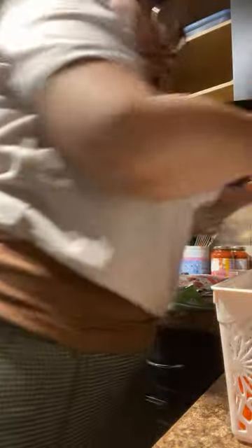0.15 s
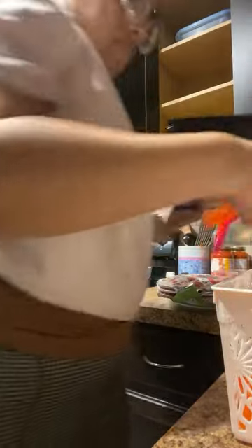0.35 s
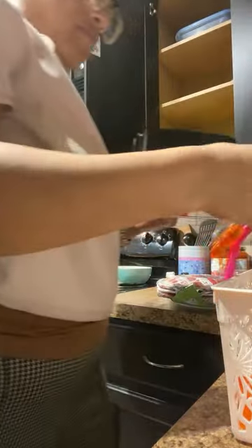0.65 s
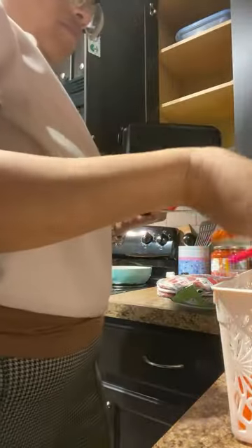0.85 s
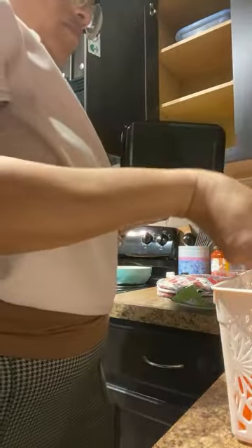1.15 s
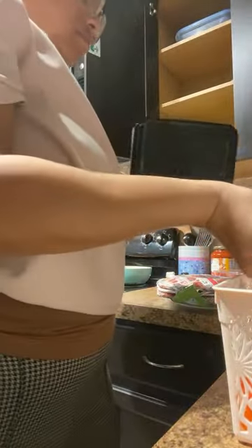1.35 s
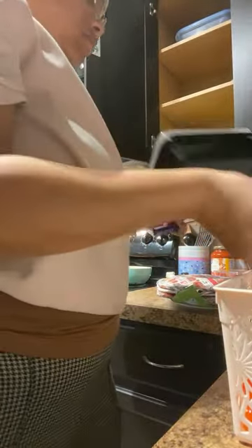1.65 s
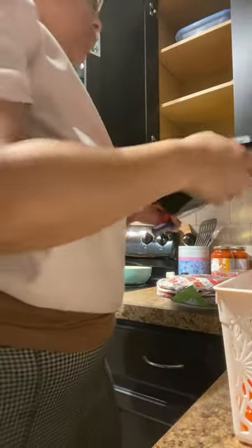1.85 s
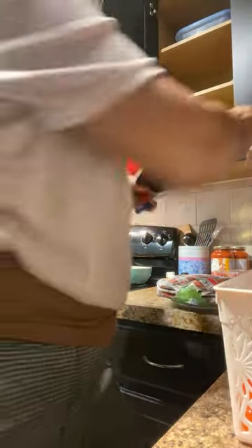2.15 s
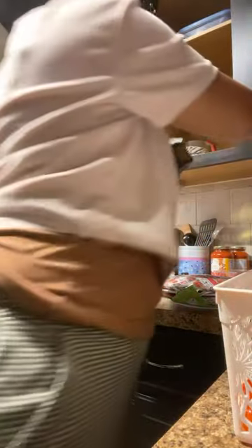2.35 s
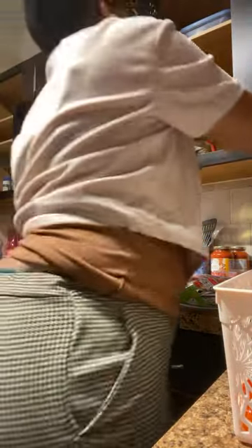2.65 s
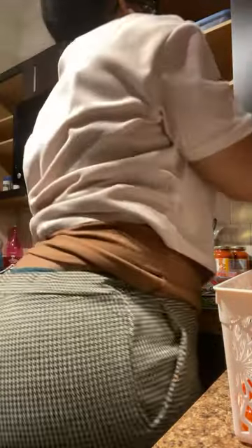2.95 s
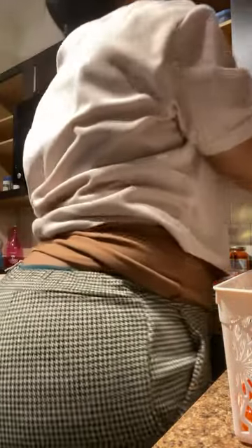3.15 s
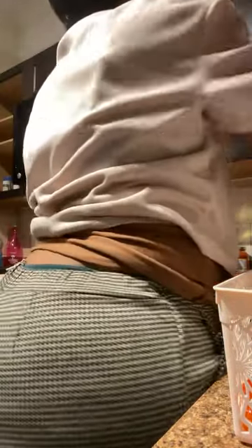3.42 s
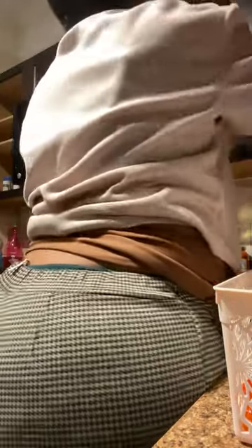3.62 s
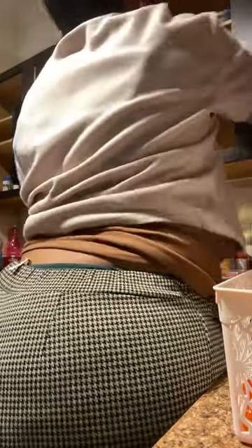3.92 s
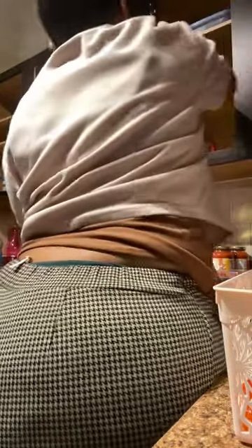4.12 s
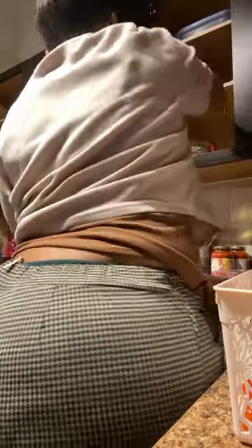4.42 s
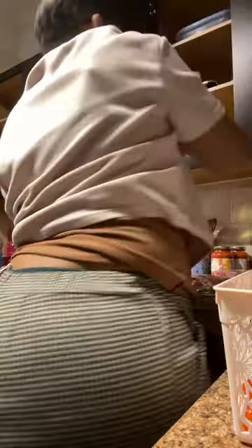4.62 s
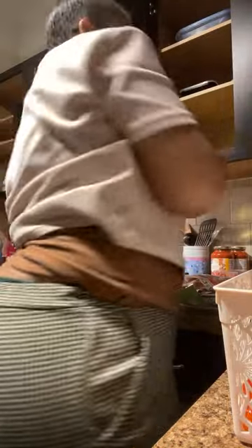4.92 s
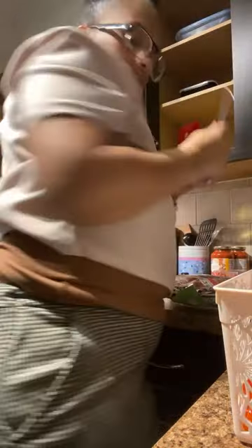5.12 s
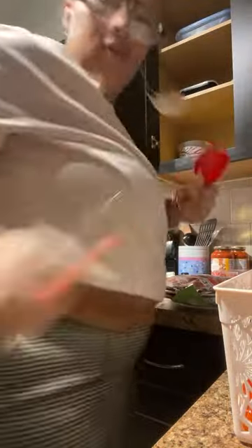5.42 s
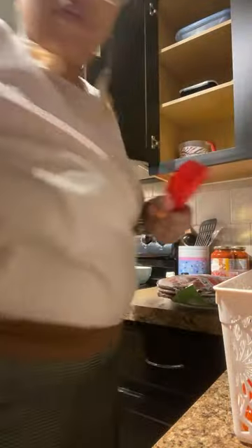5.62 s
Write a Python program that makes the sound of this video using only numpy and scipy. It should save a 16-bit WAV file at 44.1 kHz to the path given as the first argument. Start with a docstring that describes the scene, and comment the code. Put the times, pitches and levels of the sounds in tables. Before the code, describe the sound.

A bright clatter of plastic kitchen utensils, a soft scrape, then hollow knocks as a tray is pushed about on a wooden shelf.

```python
"""You hear plastic clattering, a soft scrape, then hollow wooden knocks, over a faint room hum.
Plastic measuring cups and utensils drop into a basket, then a tray is pushed about on a cupboard shelf.
Each blow is a short burst of bounces that rings four bodies: wooden shelf, tray, cups and thin utensils.
A phone picks it up; its noise suppressor lowers the hum and cuts the ringing short."""
import sys
import numpy as np
from scipy import signal
from scipy.fft import rfft, irfft
from scipy.io import wavfile
from scipy.ndimage import uniform_filter1d

SR = 44100
rng = np.random.default_rng(int(sys.argv[2]) if len(sys.argv) > 2 else 0)


def bounce(signal):
    """Save signal as a 16-bit WAV file at the path given by the first command-line argument."""
    frames = np.transpose(np.atleast_2d(signal))
    limited = np.clip(frames, -1, 1)
    pcm = np.round(limited * 32767).astype(np.int16)
    wavfile.write(sys.argv[1], SR, pcm)


N = 254448

# The modes (natural ringing notes) of the cups and utensils: (pitch [Hz], width [Hz], level [dB])
CUP_MODES = [(1555, 99, -5), (1760, 190, 3), (1913, 120, 1.5), (2270, 260, 5), (2577, 170, -0.5),
             (3010, 120, 2.5), (3490, 200, -5.5), (3800, 300, -5.5)]
UTENSIL_MODES = [(4060, 80, 1.5), (4675, 110, 3.5), (5210, 60, 6.5), (5540, 50, 6), (6300, 160, -4.5),
                 (6760, 170, -4), (7307, 60, 3), (8365, 99, 2.5), (8790, 50, 2), (9053, 50, 1.5),
                 (9350, 23, -5), (10700, 80, -6.5), (10580, 80, -7.5), (11770, 90, -1.5)]
# How shelf, tray, cups and utensils answer a blow, one row each:
# (lowest pitch [Hz], highest pitch [Hz], unpitched noise [dB], share of the blow's fade time [ratio],
#  first click [dB], first burst's fade [s], struck spot's ring [dB], that ring's width [Hz])
BODIES = [(121.3, 590, -11.5, 1, 19, .006, 5, 46), (494, 1264, -7.5, 0.99, 27, 0.0091, 0, 95),
          (1250, 3800, -3, 0.68, 12, 0.0012, -0.5, 180), (3900, 11000, -0.5, .7, 6.5, .003, 1.5, 90)]
LATE_S, LATE_NOISE_DB = 2.0, 6.5   # from then on the high clatter is noisier and rings less
SUPPRESS_DB, CUTOFF_HZ = 11, 15500   # the phone's deepest noise cut and its upper pitch limit
ONSET_S = .025   # a blow's or clink's level is set over this opening stretch


def amp(db):
    """Turn decibels into a factor to multiply by."""
    return 10 ** (np.asarray(db) / 20)


def rms_one(x):
    """Scale a sound so that its average strength (rms) is 1."""
    return x / np.sqrt(np.mean(x ** 2) + 1e-20)


def resonance(x, hz, width):
    """Make a sound ring at one pitch; the smaller the width in Hz, the longer it rings."""
    r = np.exp(-np.pi * width / SR)
    feedback = [1, -2 * r * np.cos(2 * np.pi * hz / SR), r * r]
    return signal.lfilter(np.array([1, 0, -1]) * (1 - r * r) / 2, feedback, x)


def band(x, low_hz, high_hz):
    """Keep what lies between two pitches."""
    return signal.sosfilt(signal.butter(4, [low_hz, high_hz], "band", fs=SR, output="sos"), x)


def swell(start, end, level_db, rise_db_per_s, fade_db_per_s):
    """A volume curve: it rises until the start, holds, and fades after the end."""
    t = np.arange(N) / SR
    rise_db = rise_db_per_s * np.maximum(start - t, 0)
    fade_db = fade_db_per_s * np.maximum(t - end, 0)
    return amp(level_db - rise_db - fade_db)


def contacts(shape, per_s, rough_db):
    """Noise that jumps in level each time two surfaces touch."""
    touches = (rng.random(shape) < per_s / SR) * amp(rough_db * np.minimum(rng.exponential(1, shape), 3))
    level = signal.lfilter([1], [1, -np.exp(-1 / (0.0066 * SR))], touches) + 0.89
    return rms_one(level * rng.standard_normal(shape))


def whistle():
    """A faint, thin, wavering tone that sinks slowly."""
    # The tone's glide: (start [s], end [s], first pitch [Hz], last pitch [Hz], level [dB])
    glide = (2, 6.5, 3999, 3650.5, -83.5)
    start, end, first_hz, last_hz, level_db = glide
    hz = np.interp(np.arange(N) / SR, [start, end], [first_hz, last_hz])
    tone = np.sqrt(2) * np.sin(2 * np.pi * np.cumsum(hz) / SR)
    waver = rms_one(resonance(rng.standard_normal(N), 20., 28.0))
    return swell(start, end, level_db, 100., 100.) * waver * tone


def hum():
    """Steady room noise with two faint appliance tones and the whistle."""
    # How strong the room noise is from bass to treble: (pitch [Hz], relative level [dB])
    noise_shape = [(35, -56), (60, -22), (170, -11.5), (203, -6.5), (232, 0), (289, -9.5), (331, 1.5),
                   (369, -5.5), (1050, -9), (1310, -10.5), (1530, -11.5), (2600, -15.5), (3790, -19.5),
                   (7000, -29.5), (12000, -39), (15600, -70.5), (22000, -120)]
    # The appliance tones: (pitch [Hz], level [dB])
    appliance_tones = [(231, -90.5), (1572, -81.5)]
    shape_hz, shape_db = np.transpose(noise_shape)
    hz = np.fft.rfftfreq(N, 1 / SR) + 1
    colour = amp(np.interp(np.log(hz), np.log(shape_hz), shape_db))
    noise = amp(-69.5) * rms_one(irfft(rfft(rng.standard_normal(N)) * colour, N))
    tones = sum(amp(db) * rms_one(resonance(rng.standard_normal(N), pitch, 8.5))
                for pitch, db in appliance_tones)
    return amp(SUPPRESS_DB) * (noise + tones + whistle())   # raised by as much as the phone will cut


def room_echo(x, fade_s=0.3, treble_fade_s=0.17, treble_db=-8.5):
    """Reflections from the walls blur into a dying tail whose treble is weaker and dies first."""
    t = np.arange(SR // 3) / SR
    dull = rms_one(band(rng.standard_normal(len(t)), 57.9, 3500.0)) * amp(-60 * t / fade_s)
    bright = amp(treble_db - 60 * t / treble_fade_s) * rng.standard_normal(len(t))
    tail = (dull + bright) * (t > .006)
    return signal.fftconvolve(x, tail / np.sqrt(np.sum(tail ** 2)))[:N]


def tray_drag(edge_db_per_s=588):
    """The tray rubs along the shelf, and the friction makes three modes ring."""
    # The modes that the rubbing rings: (pitch [Hz], width [Hz], level [dB])
    modes = [(1130.6, 30.3, -2), (1298, 45, -9.5), (1399, 140, -15.5)]
    # The two pushes of the tray: (start [s], end [s], level [dB])
    strokes = [(2.289, 2.666, -50), (2.693, 3.087, -47.5)]
    friction = contacts(N, per_s=34.0, rough_db=1.5)
    scrape = sum(amp(db) * resonance(resonance(friction, hz, width), hz, 3 * width)
                 for hz, width, db in modes)
    return sum(swell(*row, edge_db_per_s, edge_db_per_s) for row in strokes) * rms_one(scrape)


def slides(rise_db_per_s=1501):
    """Cups and utensils slide: each mode gets its own light touches, so the tone keeps shifting."""
    # Each slip: (start [s], hold [s], cups [dB], utensils [dB], cups fade [dB/s], utensils fade [dB/s])
    slips = [(1.371, 0.019, -32.5, -22.5, 307, 304), (1.411, 0.0018, -21, -11.5, 158, 245),
             (1.633, 0.069, -28.5, -27.5, 155, 205), (3.579, .002, -39, -38, 753.5, 898),
             (3.619, 0.0016, -19, -60, 167.5, 269), (3.779, 0.025, -26, -54, 292, 354.5),
             (4.172, 0.0018, -24, -43, 498, 154), (4.227, 0.15, -43.5, -47.5, 400, 500),
             (3.72, 0.08, -46.5, -53.5, 303.5, 600), (4.397, 0.0032, -18, -42, 659, 901.5)]
    out, t = np.zeros(N), np.arange(N) / SR
    sliding = ((t > 1.3) & (t < 2)) | ((t > 3.5) & (t < 4.6))
    late_noise_db = LATE_NOISE_DB * (t[sliding] > LATE_S)
    sliders = [(CUP_MODES, 3.2, -0.5), (UTENSIL_MODES, 1.3, -4. + late_noise_db)]
    for k, (modes, widen, noise_db) in enumerate(sliders):
        low_hz, high_hz = BODIES[k + 2][:2]
        volume = sum(swell(row[0], row[0] + row[1], row[2 + k], rise_db_per_s, row[4 + k])
                     for row in slips)
        pushes = contacts((len(modes) + 1, sliding.sum()), per_s=40., rough_db=6.)
        ring = sum(amp(db) * resonance(push, hz, widen * width)
                   for push, (hz, width, db) in zip(pushes, modes))
        noise = amp(noise_db) * rms_one(band(pushes[-1], low_hz, high_hz))
        out[sliding] += volume[sliding] * rms_one(rms_one(ring) + noise)
    return out


def clinks():
    """A short, rough tap on a single cup gives one clear note."""
    # Each tap: (time [s], pitch [Hz], width [Hz], level [dB], time to fade by 60 dB [s])
    taps = [(1.326, 4560, 150, -52, 0.079), (1.714, 2250, 200, -30, 0.18), (3.411, 2050, 250, -39.5, .08),
            (5.728, 1850, 400, -39.5, 0.078)]
    out, t = np.zeros(N + SR), np.arange(SR // 4) / SR
    for start, hz, width, level_db, fade_s in taps:
        push = rng.standard_normal(len(t)) * amp(-60 * t / fade_s)
        push[0] += amp(20.5)   # the first touch is one hard click
        note = resonance(resonance(push, hz, width), hz, width)
        out[round(start * SR):][:len(t)] += amp(level_db) * note / np.std(note[t < ONSET_S])
    return out[:N]


def struck_body(pushes, modes, low_hz, high_hz, noise_db, spot_hz, spot_db, spot_width):
    """One body rings, one row per blow; modes near the struck spot's pitch tend to ring the most."""
    hz, widths, level_db = np.transpose(modes)
    in_range = (spot_hz > low_hz) & (spot_hz < high_hz)
    db_per_octave = np.where(in_range, 6, 4.5)[:, None]
    octaves_away = abs(np.log2(hz / spot_hz[:, None]))
    chance_db = 3.5 * rng.standard_normal((len(pushes), len(modes)))   # no two blows sound alike
    strength = amp(level_db + chance_db - db_per_octave * octaves_away)
    total_strength = np.sqrt(strength ** 2 @ widths)[:, None]
    out = amp(noise_db) * total_strength / np.sqrt(high_hz - low_hz) * pushes
    for k in range(len(modes)):
        out += strength[:, [k]] * resonance(pushes, hz[k], widths[k]) * (-1) ** k
    spot_ring = np.array([resonance(push, pitch, spot_width) for push, pitch in zip(pushes, spot_hz)])
    out += in_range[:, None] * amp(spot_db) * total_strength / np.sqrt(spot_width) * spot_ring
    out = band(out, low_hz, high_hz)
    # The contact dulls whatever lies well above the spot's pitch.
    top_hz = np.where(in_range, np.minimum(1.675 * spot_hz, CUTOFF_HZ), CUTOFF_HZ)
    return np.array([signal.lfilter(*signal.butter(2, top, fs=SR), row) for row, top in zip(out, top_hz)])


def blows():
    """Each blow is a sharp touch and then dying bounces, heard through all four bodies."""
    # Each blow: (time [s], shelf [dB], tray [dB], cups [dB], utensils [dB], spot pitch for shelf and
    #  tray [Hz], spot pitch for cups and utensils [Hz], base time for the bounces to fade by 60 dB [s])
    hits = [(0.01, -66, -46, -53.5, -72, 853, 1370, 1),
            (0.058, -68.5, -46.5, -51.5, -81.5, 1010, 1430, 0.11),
            (0.091, -69, -30, -35.5, -63, 790, 1306, 0.2), (0.206, -61, -36, -52, -64.5, 680, 1490, 0.079),
            (0.222, -77.5, -69, -53, -69, 670, 1330, 0.59),
            (0.246, -45, -34.5, -40.5, -61, 800, 1440, 0.088),
            (0.304, -57, -42, -47.5, -82, 790, 1560, 0.15), (0.875, -73, -71, -79, -70.5, 410, 5880, 0.15),
            (0.923, -34, -28, -42.5, -58.5, 527.5, 1306, 0.15),
            (1.312, -80, -78.5, -74.5, -53.5, 740, 10650, 0.12),
            (1.327, -75.5, -71.5, -62, -37, 530, 6870, 0.07),
            (1.366, -42, -36.5, -27.5, -25, 1120, 5450, 0.16),
            (1.391, -33.5, -43, -26, -30, 1190, 8250, 0.19),
            (1.407, -41.5, -33, -20, -17, 990, 8330, 0.072),
            (1.418, -47.5, -42, -30.5, -24, 1400, 8974, 0.1),
            (1.427, -38, -42.5, -28.5, -29.5, 1400, 7444, 0.12),
            (1.465, -53, -46.5, -44, -36.5, 1130, 7064, 1),
            (1.602, -60, -36.5, -24, -26.5, 1170, 2270, 0.57),
            (1.615, -39, -38.5, -29.5, -27.5, 1290, 4490, 0.21),
            (1.661, -41, -38, -45, -25.5, 1322, 5100, 0.45),
            (1.686, -61.5, -52.5, -23, -19.5, 1280, 10410, 0.072),
            (1.7125, -48, -39, -24, -20.5, 1370, 2207, 0.27),
            (1.771, -47, -45.5, -38.5, -39, 810, 4290, 0.14),
            (2.05, -62.5, -39.5, -44, -63.5, 1033, 1480, 0.27),
            (2.128, -81, -52.5, -57, -74, 905, 1620, 0.35), (2.2, -79, -54, -71.5, -90, 858, 1560, 0.16),
            (2.252, -77, -45.5, -45.5, -75, 929, 1670, 0.24),
            (2.278, -83, -60, -47.5, -65, 1047, 1350, 0.14),
            (2.314, -73, -48.5, -54.5, -89, 1057, 1340, 0.52),
            (2.404, -52.5, -48.5, -57.5, -64, 595, 1540, 0.17),
            (2.524, -62, -42, -45.5, -45.5, 300, 9150, 0.055),
            (2.529, -28, -35, -36.5, -38, 250, 4140, 0.16),
            (2.739, -78.5, -52, -39.5, -65, 1115, 2235, 0.203),
            (2.888, -79, -52.5, -48.5, -68, 1080, 1470, 0.35),
            (2.918, -70.5, -55.5, -48.5, -62, 1110, 2090, 0.36),
            (3.14, -46.5, -32.0, -34.5, -58, 684, 1360, 0.15), (3.192, -83, -39, -46, -72, 817, 2530, 0.18),
            (3.322, -66.5, -48, -56.5, -87, 702.6, 2138, 0.2),
            (3.346, -59, -51.5, -51, -82, 790, 1780, 0.13),
            (3.411, -56.5, -39.0, -53, -73.5, 710, 2050, 0.054),
            (3.453, -47.5, -29, -30, -52.5, 644, 9500, 0.22),
            (3.483, -49, -36, -47, -65.5, 796, 2160, 0.041),
            (3.562, -71.5, -45, -56.5, -70, 1170, 1500, 0.053),
            (3.575, -35.5, -29, -31, -39.5, 584, 3200, 0.1),
            (3.613, -12.5, -9.5, -13, -28, 633, 2078, 0.12),
            (3.642, -30, -31, -32.5, -33.5, 247, 1538, 0.32),
            (3.741, -41.5, -23.5, -34.5, -45, 604, 8030, 0.63),
            (3.767, -41, -29, -40.5, -49.5, 800, 10160, 0.2), (3.786, -15, -15, -18, -51, 385, 1448, 0.19),
            (3.815, -22, -31, -29, -35, 812, 2326, 0.11), (3.858, -24, -30, -31.5, -75, 390, 1426, 0.11),
            (3.919, -19, -23, -33.5, -75, 363, 1800, 0.24),
            (4.016, -21.5, -26.5, -41.5, -77, 364, 2010, 0.39),
            (4.107, -26.5, -24, -36.5, -54.5, 626, 2110, 0.2),
            (4.168, -21.5, -15.5, -32.5, -34, 740, 1900, 0.18),
            (4.205, -32, -32, -53, -36, 794, 5100, 0.97), (4.25, -24.5, -25, -33, -35.5, 660, 6120, 0.17),
            (4.321, -69.5, -42, -38.5, -42, 342, 2650, 0.48),
            (4.397, -17, -20, -50, -29.5, 244, 2600, 0.13), (4.424, -24.5, -30, -42, -59, 230, 1578, 0.24),
            (4.468, -43.5, -33.5, -55.5, -70, 241.6, 1586, 0.29),
            (5.705, -77, -51.5, -79, -79, 817, 1756, 0.26), (5.728, -81, -53.5, -56, -63, 880, 1760, 0.15)]
    # The modes of the wooden shelf and of the tray: (pitch [Hz], width [Hz], level [dB])
    shelf_modes = [(178, 24, -15), (231.2, 28, 5.5), (286, 100, 8), (321.4, 20, 0), (380, 71, 3),
                   (445.7, 60, -12)]
    tray_modes = [(509, 60, -11.5), (624, 64, 6.5), (740, 110, -1.5), (812.3, 60, 6), (913, 13, -11.5),
                  (1146, 23, 5.5), (1328, 100, -3.5)]
    hits = np.array(hits)
    out, t = np.zeros(N + SR), np.arange(SR // 3) / SR
    bounces = contacts((len(hits), len(t)), per_s=90., rough_db=1.1)
    for k, modes in enumerate([shelf_modes, tray_modes, CUP_MODES, UTENSIL_MODES]):
        low_hz, high_hz, noise_db, fade_share, click_db, burst_s, spot_db, spot_width = BODIES[k]
        starts, levels_db, spot_hz = hits[:, 0], hits[:, 1 + k], hits[:, 5 + k // 2]
        fade_s = np.clip(hits[:, [7]] * fade_share, .02, .5)
        pushes = bounces * (amp(-60 * t / fade_s) + np.exp(-t / burst_s))
        pushes[:, 0] += amp(click_db)
        if modes is UTENSIL_MODES:
            noise_db = noise_db + LATE_NOISE_DB * (starts[:, None] > LATE_S)
        rings = struck_body(pushes + 1e-12, modes, low_hz, high_hz, noise_db, spot_hz, spot_db, spot_width)
        for start, level_db, ring in zip(starts, levels_db, rings):
            out[round(start * SR):][:len(t)] += amp(level_db) * ring / np.std(ring[t < ONSET_S])
    return out[:N]


def scene():
    """Blows, clinks, slides and the dragged tray echo in the room, over the hum."""
    clatter = blows() + clinks() + slides() + tray_drag()
    return (clatter + amp(-20.0) * room_echo(clatter) + hum())[None]


def noise_suppressor(x):
    """The phone turns each pitch down while it stays near its own usual quiet level."""
    spectrum = signal.stft(x, nperseg=512, noverlap=384)[2]
    power = uniform_filter1d(abs(spectrum) ** 2, size=7, axis=1)   # smooth across pitch
    power = uniform_filter1d(power, size=5, axis=2)   # and across time
    quiet = np.percentile(power, 30, axis=2, keepdims=True)
    khz = np.fft.rfftfreq(512, 1000 / SR)[:, None]
    margin_db = 10.5 + 12.5 * np.clip(khz - 4.5, 0, 1)   # stricter in the treble
    gain = np.clip(1 - amp(2 * margin_db) * quiet / power, 0, 1) ** 1.3 + amp(-SUPPRESS_DB)
    return signal.istft(spectrum * np.minimum(gain, 1), nperseg=512, noverlap=384)[1][:, :N]


def record(dry, treble_edge_hz=12400, bass_edge_hz=47.8):
    """The phone lowers the noise, clips overloud peaks and loses the highest treble and deepest bass."""
    x = noise_suppressor(dry)
    x = signal.sosfilt(signal.cheby2(8, 38., treble_edge_hz, fs=SR, output="sos"), x)
    x = np.clip(x, -1, 1)
    x = signal.sosfilt(signal.butter(2, bass_edge_hz, "high", fs=SR, output="sos"), x)
    return signal.sosfilt(signal.cheby2(12, 70, CUTOFF_HZ, fs=SR, output="sos"), x)


dry = scene()
out = record(dry)
bounce(out)
```